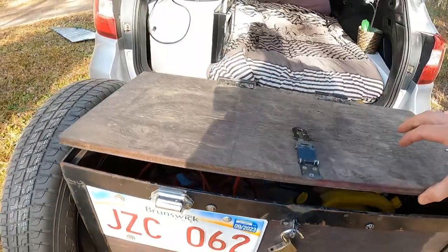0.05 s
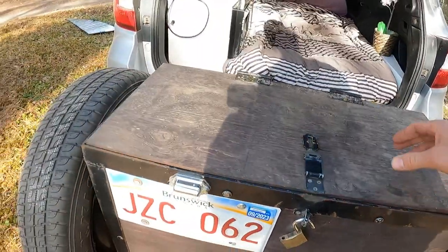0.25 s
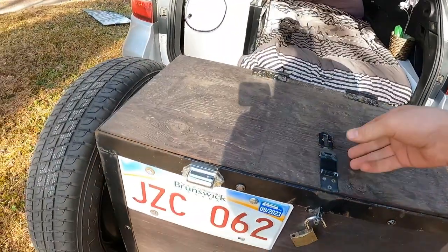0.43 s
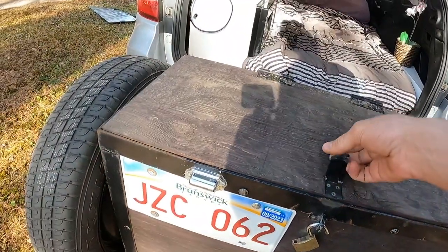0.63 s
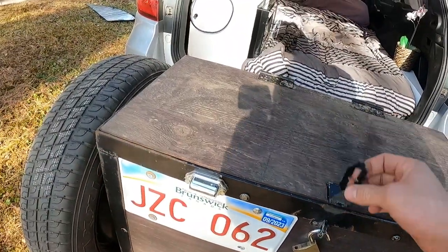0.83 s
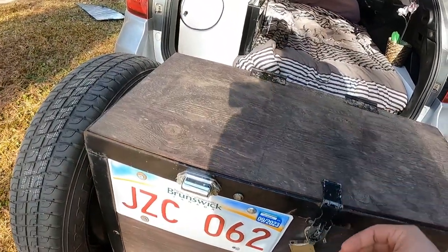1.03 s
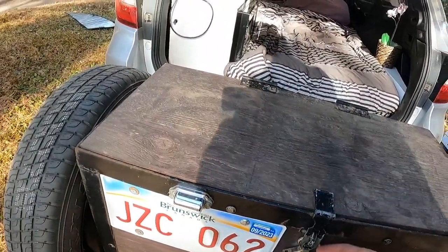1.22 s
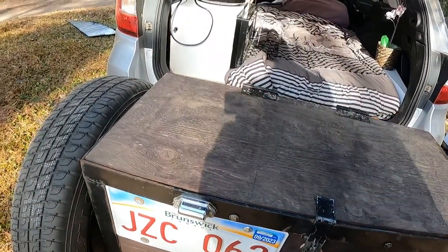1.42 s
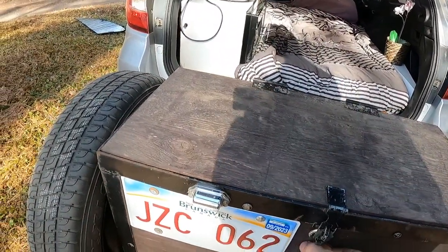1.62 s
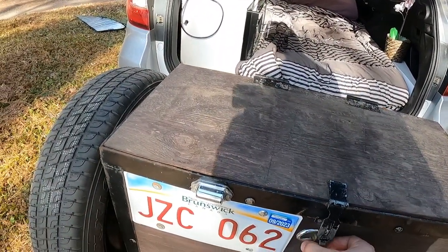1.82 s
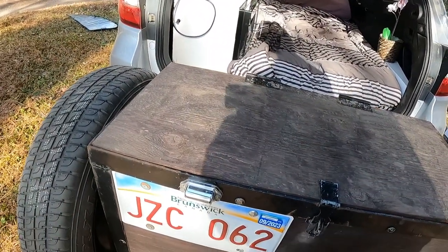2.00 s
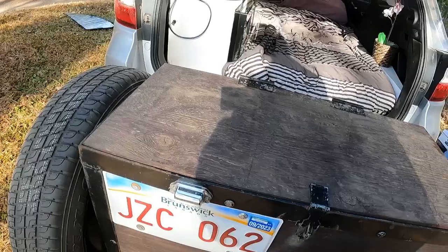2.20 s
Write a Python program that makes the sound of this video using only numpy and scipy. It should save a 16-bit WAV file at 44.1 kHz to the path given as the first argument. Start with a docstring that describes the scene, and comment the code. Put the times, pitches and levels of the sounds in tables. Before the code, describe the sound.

A wooden box lid thuds shut, then a metal hasp and padlock clack and rattle.

```python
"""Outdoors and close by, a plywood box lid drops shut on the back of a parked car, and the box booms.
Next a hand swings the steel hasp (a hinged latch plate) over and slaps it onto its staple (a fixed loop).
Last, a padlock knocks on the box, and its curved bar, the shackle, is hooked through the staple.
All along, each contact clacks in the steel and knocks the hollow box; hinges and shackle scrape in
between. The car's open boot adds a short echo, and quiet open air lies behind it all."""
import sys
import numpy as np
from scipy import signal
from scipy.fft import rfft, irfft, next_fast_len
from scipy.io import wavfile
from scipy.ndimage import map_coordinates

SR = 44100
rng = np.random.default_rng(int(sys.argv[2]) if len(sys.argv) > 2 else 0)


def to_wav(sig):
    """Store sig (one row per channel, or 1-D mono) as 16-bit WAV at the path in sys.argv[1].

    Samples outside -1..1 are clipped; the rate is SR.
    """
    pcm = np.clip(np.atleast_2d(sig), -1, 1) * 32767
    pcm = np.round(pcm).astype(np.int16)
    wavfile.write(sys.argv[1], SR, pcm.T)  # frames by channels


N = 103635
T = np.arange(N) / SR  # seconds since the scene began
HIT_T = np.arange(16384) / SR  # seconds since one hit began

# A "colour" says how strong a noise is at each pitch. A fade_s is the time to die away by 60 dB.
# Colours of the open air and of its faint hiss: pitch_hz, level_db
AIR_COLOUR = [(20, -0.5), (60, -7), (95, -10.5), (170, -6.5), (300, -18.5), (650, -22.5), (1300, -19),
              (2600, -40), (16000, -58)]
HISS_COLOUR = [(1500, 6.5), (3000, 3), (7500, -8.5), (12000, -33), (16000, -28.5)]
# How loud the hiss is as time passes: time_s, level_db
HISS_LEVELS = [(0, -58), (1.1, -57), (1.55, -64.5), (2.0, -67), (2.35, -95)]
# How long the open boot echoes: pitch_hz, fade_s
BOOT_ECHO = [(100, 0.41), (1500, 0.17), (12000, .12)]
# How alike a noise is in the two ears: pitch_hz, likeness (1 means the same)
EAR_LIKENESS = [(60, 1), (1200, 0.77), (13000, .8)]
# How much louder the left side is than the right: pitch_hz, left_minus_right_db
EAR_BALANCE = [(60, 0), (1000, -.6), (5000, -2.6), (12000, -3)]

# The whole box heaves and booms: start_s, pitch_hz, level_db, rise_s, fade_s
BOX_THUMPS = [(0.244, 43.6, -10.5, 0.0078, 0.1), (.304, 335, -27.5, 0.0016, 0.15),
              (0.305, 79.5, -21.5, 0.0028, 0.28), (.31, 106.6, -29, 0.0046, 0.83),
              (0.534, 125, -10.5, 0.00185, 0.03), (.548, 79, -25.5, .004, 0.41),
              (0.743, 74, -28.5, 0.0084, 0.44), (1.075, 76.3, -11.5, 0.003, 0.14),
              (1.084, 114.6, -35.5, .01, 0.83), (1.102, 43.3, -27.5, 0.077, 1.1),
              (1.434, 75.5, -32, 0.0026, .12), (2.063, 62.3, -26.5, 0.0019, 0.32)]
# Hinges and shackle slide: start_s, length_s, level_db, swell_db, treble_db
SCRAPE_STROKES = [(0.186, 0.067, -50.5, 9.5, 8), (0.667, 0.05, -36, 2.5, -5),
                  (0.804, 0.18, -58, 15.5, -3.5), (0.978, 0.12, -34.5, 7.5, -8.5),
                  (1.656, 0.17, -49.5, 6.5, -1.5), (1.871, 0.029, -46, 7, 3)]
# Colours of the dull and the bright part of a scrape: pitch_hz, level_db
DULL_RUB_COLOUR = [(150, -3.5), (1300, -7.5), (2200, -12), (4000, -45.5)]
BRIGHT_RUB_COLOUR = [(1200, 3.5), (2300, 5.5), (4200, 3.5), (7000, -8.5), (15000, -44)]

# Colours of a hit, low to high (box knock, panel clack, steel clash, steel sizzle): pitch_hz, level_db
KNOCK_COLOUR = [(70, -10), (140, 3.5), (190, -1), (330, -4.5), (450, -9.5), (600, -19.5), (1200, -58)]
CLACK_COLOUR = [(300, -50), (560, -8.5), (750, -1.5), (1000, -4), (1380, 3), (1800, -8), (2400, -12),
                (4000, -56.5)]
CLASH_COLOUR = [(1200, -23), (2200, 3.5), (3000, 1.5), (4000, 1.5), (5300, -1.5), (6700, -5.5), (7800, -18),
                (11000, -67)]
SIZZLE_COLOUR = [(5000, -1.5), (7500, 5), (9500, 0), (10700, -4), (12400, -4.5), (14000, -15), (16000, -36)]
# The tones each part rings with when it is struck: pitch_hz, level_db, fade_s
BOX_TONES = [(169.2, 3, 0.22), (228.6, -4.5, 0.37), (252, -2.5, .25), (280, -5, 0.3), (340.2, 0, .2),
             (445, -8, 0.24), (592.3, -8.5, 0.22)]
PANEL_TONES = [(971.6, 2, 0.12), (1215, 1.5, 0.054), (1310, -7.5, 0.056), (1564, 6.5, 0.063)]
PADLOCK_TONES = [(1077, -3, 0.081), (1375, 1.5, 0.033), (1549, 8, 0.012), (2650, -10.5, 0.054),
                 (3060, 4.5, 0.0087)]
SHACKLE_TONES = [(3865, 0, 0.09), (4990, -12, 0.067)]
HASP_TONES = [(2137, -9, 0.08), (2447, -8, 0.053), (2717, -4.5, 0.04), (3182, -2.5, 0.027),
              (3686, -6, 0.045), (4070, 0, 0.041), (4970, -3, 0.028), (5360, -6.5, 0.034)]
LOOSE_LOOP_TONES = [(6830, 0, 0.065), (8880, -12, 0.07), (9880, -18, 0.06), (11140, -22, 0.085)]

# The next two tables set how strong each part of a hit is; contact() then shifts those levels.
# The lid and the hasp hit: start_s, clack_db, knock_db, clash_db, sizzle_db, clash_tilt_db_per_octave
LID_AND_HASP_HITS = [(.039, -46.5, -42.5, -44, -67, -1), (.195, -41, -44.5, -35.5, -76, -23),
                     (0.256, -35, -31.5, -24, -47.5, -1.5), (0.302, -24, -25, -39.5, -71, -5.5),
                     (.534, -38, -31.5, -40.5, -66.5, 0), (.582, -27, -31.5, -17, -32.5, -2.5),
                     (0.588, -18, -30, -16.5, -35.5, 3), (.606, -20.5, -30.5, -28, -44.5, -2),
                     (.710, -17.5, -32.5, -21.5, -36, 0), (.736, -20, -37, -15, -32.5, 0),
                     (.743, -21.5, -27.5, -32.5, -57.5, -12), (.974, -19, -27, -18, -40, -4),
                     (1.002, -26, -35.5, -21.5, -44.5, 3), (1.033, -21.5, -30, -18, -30.5, 10.5),
                     (1.039, -18.5, -37.5, -15.5, -35, 9), (1.068, -20.5, -24.5, -14.5, -24, 2),
                     (1.074, -11, -19.5, -14, -26.5, 4.5), (1.156, -32.5, -41.5, -37.5, -55, -8.5)]
# The padlock hits: start_s, clack_db, knock_db, clash_db, sizzle_db, ring_db
PADLOCK_HITS = [(1.296, -18, -29, -43.5, -81, -33.5), (1.361, -40.5, -53, -65, -76, -59.5),
                (1.615, -19.5, -19.5, -42, -58, -34), (1.624, -20.5, -27.5, -32.5, -48.5, -45),
                (1.651, -28, -36, -24.5, -37.5, -25.5), (1.656, -18, -40, -24.5, -43, -23.5),
                (1.777, -30, -42.5, -21, -44, -52), (1.783, -15, -24, -15.5, -36, -12.5),
                (1.801, -23.5, -25.5, -32.5, -44, -38), (1.846, -27.5, -35, -31, -59, -43.5),
                (1.895, -21.5, -31.5, -25, -46.5, -27.5), (2.047, -34, -39.5, -28, -44.5, -46),
                (2.053, -21.5, -36.5, -32, -50.5, -23.5), (2.126, -37, -43, -51, -59, -46.5),
                (2.16, -40, -48, -47, -89, -47.5)]
# The hasp's loose loop swings free and jingles: start_s, level_db, tilt_db_per_octave
LOOP_JINGLES = [(.929, -51, 18), (1.075, -23, -1)]
# The shackle springs free of the staple and rings: start_s, level_db
SHACKLE_RINGS = [(1.784, -24), (1.847, -41)]


def amp(db):
    """Turn decibels into a number to multiply a sound by."""
    return 10 ** (np.asarray(db) / 20)


def unit(sound):
    """Scale a sound so that its average strength (rms) is 1."""
    return sound / np.sqrt(np.mean(sound ** 2) + 1e-20)


def at_pitch(table, hz):
    """Read between the rows of a (pitch_hz, value) table, on a log pitch scale."""
    pitches, values = np.transpose(table)
    return np.interp(np.log(hz + 1), np.log(pitches + 1), values)


def add(out, start_s, sound):
    """Mix a sound into out, beginning at start_s."""
    first = max(0, round(start_s * SR))
    out[..., first:first + sound.shape[-1]] += sound[..., :N - first]


def noise(colour, size=2 ** 17):
    """Stereo noise of a given colour, nearly alike in both ears."""
    hz = np.fft.rfftfreq(size, 1 / SR)
    spread = np.arccos(np.clip(at_pitch(EAR_LIKENESS, hz), -1, 1)) / 2
    phases = np.exp(2j * np.pi * rng.random((2, len(hz))))
    mid, side = irfft(phases * amp(at_pitch(colour, hz)) * [np.cos(spread), np.sin(spread)], size)
    return unit(np.array([mid + side, mid - side]))


def wobble(t, per_s):
    """A random curve that heads for a new value per_s times a second."""
    return map_coordinates(rng.standard_normal(size=8192), [t * per_s], order=1)


def flicker(t, per_s, depth_db):
    """A loudness that jumps quickly up and down at random."""
    return unit(amp(depth_db * wobble(t, per_s)))


def envelope(t, rise_s, fade_s):
    """A loudness that rises, then dies away."""
    return (1 - np.exp(-t / rise_s)) * np.exp(-np.log(1000) * t / fade_s)


def burst(colour, rise_s, fade_s):
    """Many close tones struck at once blur into a short noise."""
    return noise(colour, size=len(HIT_T)) * envelope(HIT_T, rise_s, fade_s)


def ring(tones, scatter_db=1, rise_s=0.00091):
    """A struck part rings with its own tones, a little differently at each hit."""
    out = np.zeros(len(HIT_T))
    for hz, db, fade_s in tones:
        strength = amp(db + scatter_db * rng.normal())
        wave = np.sin(2 * np.pi * (hz * HIT_T + rng.random()))
        out += strength * wave * envelope(HIT_T, rise_s, fade_s)
    return out


def open_air(air_db):
    """Quiet outdoor air, with a faint hiss that dies away."""
    hiss = amp(np.interp(T, *np.transpose(HISS_LEVELS))) * noise(HISS_COLOUR)[:, :N]
    return amp(air_db) * noise(AIR_COLOUR)[:, :N] + hiss


def boot_echo(sound):
    """The car's open boot gives a short echo whose high pitches die first."""
    hz, t, spectrum = signal.stft(rng.standard_normal((2, SR // 2)), SR, nperseg=256)
    dying = envelope(t, rise_s=0.025, fade_s=at_pitch(BOOT_ECHO, hz)[:, None])
    tail = signal.istft(spectrum * dying, SR, nperseg=256)[1]
    mid, side = signal.fftconvolve(sound, tail / np.linalg.norm(tail[0]), axes=1)[:, :N]
    return mid + amp(-9.5) * np.array([side, -side])


def box_thumps():
    """The lid pushes on the box and the box on its mount, making low booms."""
    out = np.zeros(N)
    for start_s, hz, db, rise_s, fade_s in BOX_THUMPS:
        add(out, start_s, amp(db) * np.sin(2 * np.pi * hz * T) * envelope(T, rise_s, fade_s))
    return out


def scrapes(roughness_db, edge_s):
    """Sliding steel catches in many tiny jerks, so its rubbing sounds grainy."""
    dull, bright = np.zeros(N), np.zeros(N)
    for start_s, length_s, db, swell_db, treble_db in SCRAPE_STROKES:
        soft_edges = np.clip(np.minimum(T - start_s, start_s + length_s - T) / edge_s, 0, 1)
        progress = np.clip((T - start_s) / length_s, 0, 1)
        stroke = soft_edges * amp(db + swell_db * progress)
        dull += stroke
        bright += stroke * amp(treble_db)
    rub = dull * noise(DULL_RUB_COLOUR)[:, :N] + bright * noise(BRIGHT_RUB_COLOUR)[:, :N]
    return rub * flicker(T, per_s=830, depth_db=roughness_db)


def hinge_rasp(start_s, length_s, first_hz, last_hz, level_db, width_hz):
    """The hasp rasps on its pin: a narrow band of noise whose pitch slides as it turns."""
    turned = np.clip((T - start_s) / length_s, 0, 1)
    phase = 2 * np.pi * np.cumsum(first_hz + (last_hz - first_hz) * turned) / SR
    rasp = wobble(T, width_hz) * np.sin(phase) + wobble(T, width_hz) * np.cos(phase)
    return amp(level_db) * unit(rasp) * np.sin(np.pi * turned)


def shackle_drag(start_s, length_s, level_db, scatter_db):
    """The shackle catches at random as it drags through the staple; each catch rings the padlock."""
    push, size = rng.standard_normal((2, len(HIT_T)))
    catches = push * amp(scatter_db * size) * (HIT_T < length_s)
    ringing = signal.fftconvolve(catches, ring(PADLOCK_TONES))
    strength = np.sqrt(np.sum(ringing ** 2) / (length_s * SR))
    out = np.zeros(N)
    add(out, start_s, amp(level_db) * ringing / strength)
    return out


def jingle(tones):
    """Loose parts touch as they ring, so their tone flutters."""
    return ring(tones) * flicker(HIT_T, per_s=350, depth_db=3.5)


def contact(clack_db, knock_db, clash_db, sizzle_db, fade_s, tilt_db_per_octave=0):
    """Steel hits plywood: the steel clashes and sizzles, the panel clacks and the hollow box knocks."""
    steel_colour = [(hz, db + tilt_db_per_octave * np.log2(hz)) for hz, db in CLASH_COLOUR]
    clash = amp(clash_db - 3) * burst(steel_colour, rise_s=0.00065, fade_s=fade_s)
    sizzle = amp(sizzle_db + 3) * burst(SIZZLE_COLOUR, rise_s=0.0002, fade_s=0.75 * fade_s)
    knock = amp(knock_db) * burst(KNOCK_COLOUR, rise_s=0.0024, fade_s=2.16 * fade_s)
    clack = amp(clack_db - 4) * burst(CLACK_COLOUR, rise_s=0.0011, fade_s=fade_s)
    chatter = flicker(HIT_T, per_s=1400, depth_db=3)  # loose steel rattles within one hit
    box_ring = amp(knock_db - 12) * ring(BOX_TONES, scatter_db=4.5, rise_s=0.00079)
    panel_ring = amp(clack_db - 18) * ring(PANEL_TONES, rise_s=0.002)
    return (clash + sizzle) * chatter + knock + clack + box_ring + panel_ring


def padlock(fade_s):
    """The lock knocks on the front of the box and its shackle clanks in the staple."""
    out = np.zeros((2, N))
    for start_s, clack_db, knock_db, clash_db, sizzle_db, ring_db in PADLOCK_HITS:
        hit = contact(clack_db, knock_db, clash_db, sizzle_db, fade_s)
        add(out, start_s, hit + amp(ring_db) * ring(PADLOCK_TONES))
    for start_s, level_db in SHACKLE_RINGS:
        add(out, start_s, amp(level_db) * jingle(SHACKLE_TONES))
    return out


def lid_and_hasp(fade_s):
    """The lid lands and the hasp swings over; its plate rings at each hit and its loose loop jingles."""
    out = np.zeros((2, N))
    for start_s, clack_db, knock_db, clash_db, sizzle_db, tilt in LID_AND_HASP_HITS:
        plate = amp(clash_db - 7.5) * ring(HASP_TONES, scatter_db=2.5, rise_s=0.00043)
        add(out, start_s, contact(clack_db, knock_db, clash_db, sizzle_db, fade_s, tilt) + plate)
    lowest_hz = LOOSE_LOOP_TONES[0][0]
    for start_s, level_db, tilt in LOOP_JINGLES:  # a tilt above zero sounds brighter
        tones = [(hz, db + tilt * np.log2(hz / lowest_hz), ring_s) for hz, db, ring_s in LOOSE_LOOP_TONES]
        add(out, start_s, amp(level_db) * jingle(tones))
    return out


def scene():
    """Mix the box and its steel parts with their echo and the open air."""
    hinge = hinge_rasp(start_s=0.79, length_s=0.12, first_hz=2550, last_hz=2000,
                       level_db=-50, width_hz=520)
    drag = shackle_drag(start_s=1.675, length_s=0.1, level_db=-42, scatter_db=12)
    hits = lid_and_hasp(fade_s=0.058) + padlock(fade_s=0.061)
    near = hits + scrapes(roughness_db=3.5, edge_s=0.016) + hinge + drag
    return near + amp(-24) * boot_echo(near) + box_thumps() + open_air(air_db=-52.5)


def record(dry):
    """The box is a little to the right of the microphones, which miss the very highest pitches."""
    left_lag_s, top_hz = 0.000018, 16300
    size = next_fast_len(N + SR // 2)
    hz = np.fft.rfftfreq(size, 1 / SR)
    ears = np.array([[0.5], [-0.5]])  # left, right
    balance = amp(ears * at_pitch(EAR_BALANCE, hz))
    delay = np.exp(-2j * np.pi * hz * ears * left_lag_s)
    return irfft(rfft(dry, size) * balance * delay * (hz < top_hz), size)[:, :N]


dry = scene()
out = record(dry)
to_wav(out)
```